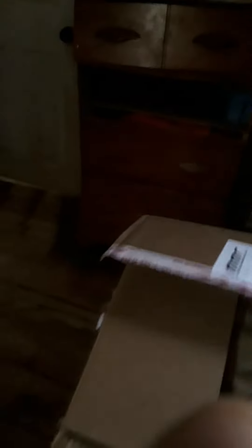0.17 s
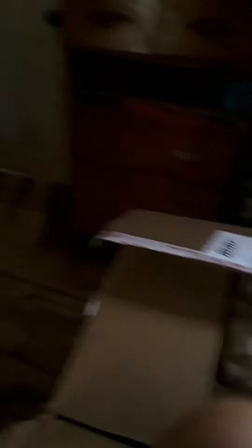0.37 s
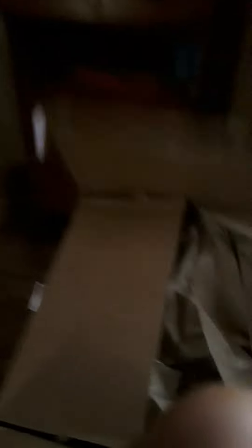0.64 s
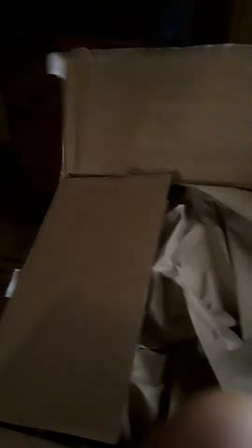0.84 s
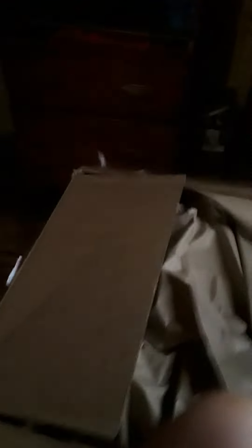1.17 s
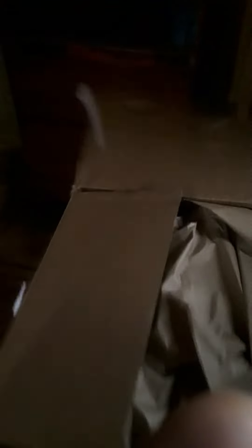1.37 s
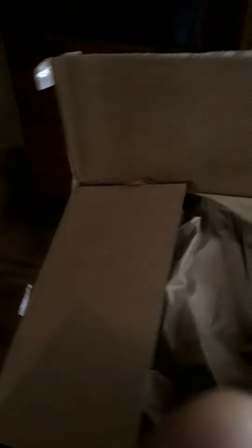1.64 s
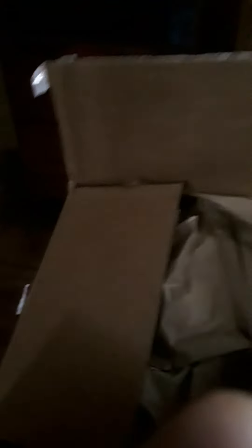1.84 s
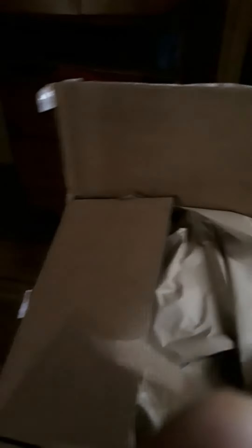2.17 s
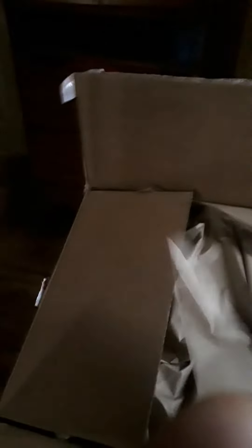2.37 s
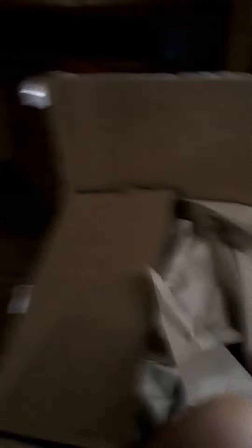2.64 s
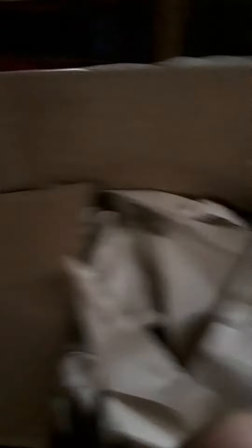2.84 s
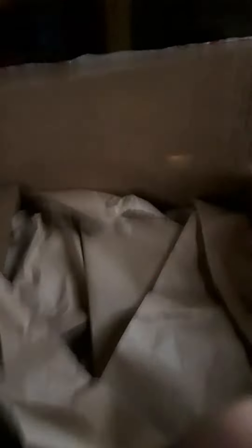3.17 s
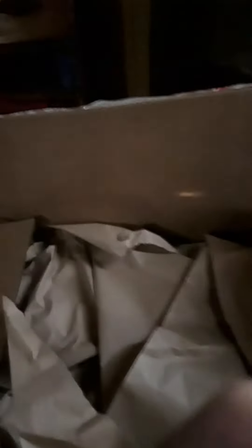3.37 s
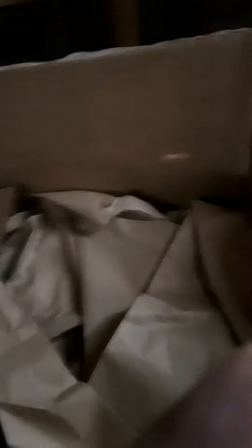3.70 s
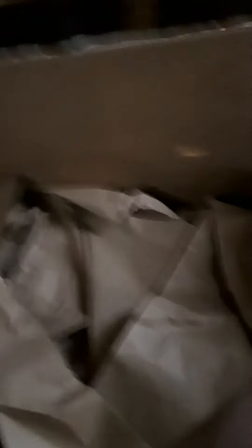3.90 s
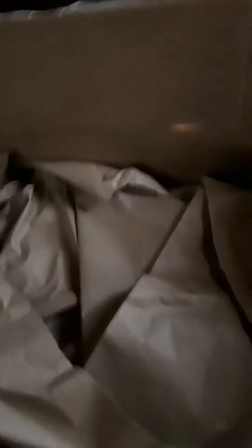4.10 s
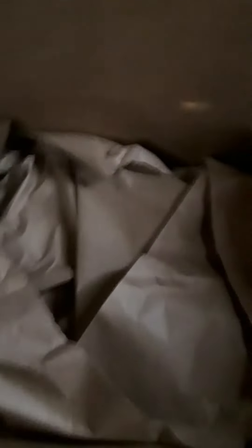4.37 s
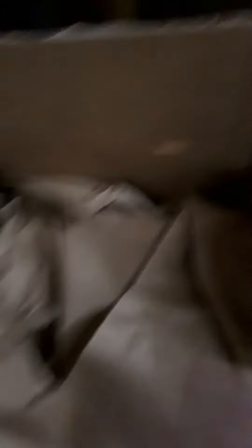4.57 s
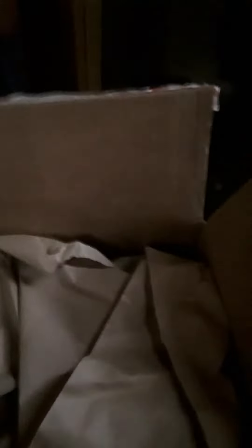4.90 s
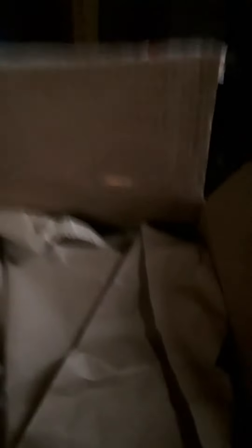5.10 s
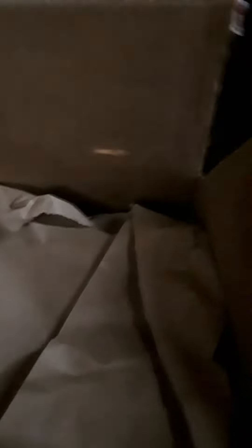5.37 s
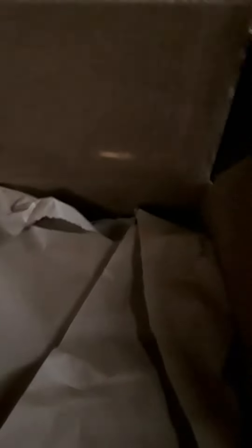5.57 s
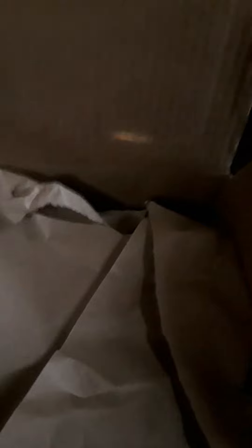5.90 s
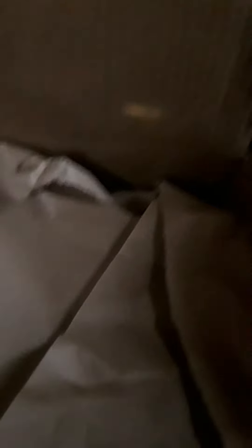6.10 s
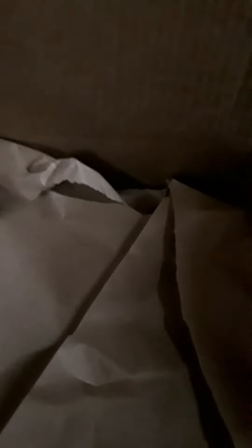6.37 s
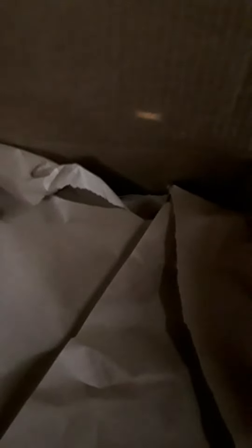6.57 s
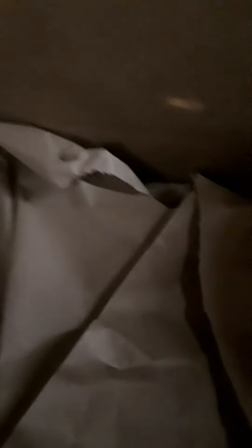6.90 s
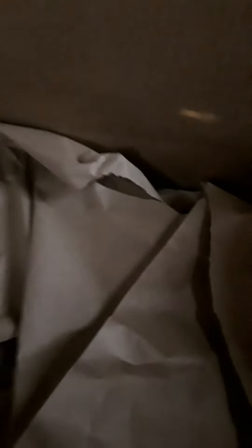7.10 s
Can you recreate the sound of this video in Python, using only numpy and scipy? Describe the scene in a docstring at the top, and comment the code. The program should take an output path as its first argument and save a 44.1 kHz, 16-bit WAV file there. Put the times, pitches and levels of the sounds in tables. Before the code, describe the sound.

A hand rustles over a cardboard box and its packing paper, with dull box rumble, dry snaps, a hushed middle and a loud crinkling finish.

```python
"""First skin hisses over cardboard while the box drones; a hand folds back the flaps and drags out packing paper.
Skin and crinkles are noise under showers of tiny slips; the scrape adds wandering resonances to such noise.
The box walls drone as rubbed noise with a ringing panel. Snaps are cracks with a brief ring, taps ring the modes
of a flap, knocks are damped thuds. Two close microphones hear it all over the soft noise of a quiet room."""
import sys
import numpy as np
from scipy import signal
from scipy.fft import rfft, irfft, next_fast_len
from scipy.io import wavfile
from scipy.ndimage import uniform_filter1d

SR = 44100
rng = np.random.default_rng(int(sys.argv[2]) if len(sys.argv) > 2 else 0)


def pcm_store(signal):
    """Save signal as 16-bit PCM."""
    levels = np.round(np.clip(np.atleast_2d(signal), -1, 1) * 32767)
    wavfile.write(sys.argv[1], SR, levels.astype(np.int16).T)


N = 319450  # length in samples

# Steady pressure of the hand between strokes: t/s, level/dB
CONTACT_PRESSURE = [(0, -43), (.125, -62), (.143, -36.5), (.42, -47.5), (.79, -49), (1.25, -88),
                    (1.66, -47.5), (1.84, -43), (2.05, -60), (2.3, -48), (2.42, -80), (2.7, -72.5),
                    (2.708, -55.5), (3.02, -71), (3.1, -56.5), (3.42, -55.5), (3.75, -66.5), (4.586, -72),
                    (4.596, -41), (4.85, -40), (5.05, -45), (5.6, -52.5), (6.17, -44.5), (6.26, -36.5),
                    (6.33, -50.5), (6.492, -58.5), (6.502, -37.5), (7.24, -45)]
# Strokes that swell and let go: peak t/s, level/dB, swell/s, release/s, extra fine skin hiss/dB
HAND_STROKES = [(.26, -36, 0.081, 0.16, -2), (.514, -40, 0.22, 0.067, 1), (0.815, -37.5, 0.02, 0.18, -5.5),
                (.968, -42.5, 0.016, 0.12, -26), (1.171, -30, 0.17, 0.091, -2.5),
                (1.308, -27, 0.013, 0.18, -4), (1.396, -24, 0.11, 0.2, -2), (1.55, -22.5, 0.019, 0.08, -11),
                (1.853, -37.5, 0.03, 0.14, 4), (2.254, -38.5, 0.092, 0.063, 5),
                (2.788, -58.5, 0.067, 0.15, 11), (3.16, -50, 0.2, 0.29, 14), (3.39, -43, 0.17, 0.096, 10),
                (3.601, -46.5, 0.25, 0.093, 1.5), (3.941, -50.5, 0.065, 0.073, 11.5),
                (4.01, -51.5, 0.3, 0.15, 3), (4.078, -49.5, 0.083, 0.038, -4),
                (4.291, -68, 0.1, 0.027, 23.5), (4.872, -33, .015, 0.2, 2), (4.983, -29.5, 0.077, 0.03, 4),
                (5.089, -32, 0.061, 0.061, 6), (5.213, -35.5, 0.2, 0.19, 3), (5.303, -33, 0.035, 0.019, 12),
                (5.462, -37.5, 0.24, 0.021, 5.5), (5.58, -43, 0.19, 0.54, 2),
                (5.904, -35, 0.047, 0.02, 5.5), (6.0, -62, 0.1, 0.055, 23),
                (6.244, -29.5, 0.074, 0.0041, 6.5), (6.639, -21.5, 0.089, 0.14, -7),
                (6.767, -23.5, 0.16, 0.048, -5), (6.849, -24, 0.057, 0.34, -4),
                (7.0, -22.5, 0.051, 0.24, -0.5), (7.073, -22, 0.28, 0.061, -26),
                (7.153, -27.5, 0.026, 0.37, -1)]
STROKE_RANGE_DB = 20  # level change over one swell or release time
# Where each way of handling puts the effort: name: (sliding skin/dB, crinkle/dB, scrape/dB, box drone/dB)
HANDLING_MIX = {"glide": (-2, -15, -19.5, -22), "lift": (-4, -8.5, -4.5, -1), "fold": (-2, -7.5, -6, -5),
                "crumple": (-3, -6, -10.5, -9.5), "drag": (-8, -11, -2.5, -2), "pull": (5.5, -6.5, -5, 0)}
# When each way of handling begins: t/s, name
HANDLING_PHASES = [(0, "pull"), (.14, "lift"), (.34, "fold"), (1.05, "crumple"), (1.9, "fold"),
                   (2.171, "crumple"), (2.702, "drag"), (2.8, "fold"), (3.1, "glide"), (4.59, "drag"),
                   (5.5, "pull"), (6.185, "glide"), (6.502, "fold"), (6.62, "crumple")]
CHANGE_S = 0.054  # time taken to pass from one to the next
# Where the hand is: t/s, lean to the left/dB (negative leans right), before the near side is held steady
HAND_PLACE = [(0, -4), (.3, 3.5), (1.7, 2.5), (2.7, 2), (3.1, -30), (3.6, -16), (4.5, -11), (5, -1),
              (7.24, -1)]

# Noise colours of the sliding skin, crinkling paper and scraping paper: f/Hz, level/dB per Hz
SKIN_SPECTRUM = [(1500, -42), (1850, -15), (2200, -27.5), (3200, -8.5), (4500, -6), (7000, -6.5),
                 (9800, -12.5), (10800, -4.5), (12400, -1), (15500, -13.5), (15800, -48.5)]
CRINKLE_SPECTRUM = [(1200, -14.5), (2000, 5.5), (3700, 5), (6500, -8.5), (9000, -21.5)]
SCRAPE_SPECTRUM = [(300, -23.5), (500, -11.5), (1750, -10.5), (2300, -16), (4000, -42)]
FINE_HZ = 8900  # above this the skin whispers
# Resonances under the dragging sheet: f/Hz (1 where SHEET_PITCH gives it), width/Hz of each pass, level/dB
SHEET_RESONANCES = [(1.0, 260, -9), (1800, 170, -9), (2930, 260, -15)]
# The lowest resonance follows the span of the sheet: t/s, f/Hz
SHEET_PITCH = [(4.62, 1050), (4.9, 1560), (5.1, 1247), (7.24, 905)]
RESONANCE_WANDER = 0.025  # rms fraction of the pitch
RESONANCE_SHARE = 1.4  # gain of the resonances against the plain drag

# Noise colour of the rubbed box walls: f/Hz, level/dB per Hz
WALL_SPECTRUM = [(45, -58), (90, -7.5), (250, -0.5), (600, -3.5), (900, -26)]
# The box panel that drones loudest: t/s, f/Hz
PANEL_PITCH = [(0, 245.6), (2.7, 420), (3, 420), (3.4, 160), (4.86, 330), (4.9, 205), (5.02, 205),
               (5.08, 410), (7.24, 400)]

# Creases that snap: t/s, relative level/dB, f/Hz of the buckling patch
CREASE_SNAPS = [(1.162, -12, 4730), (1.23, -27, 1860), (1.306, -25, 950), (1.386, -6.5, 4660),
                (1.387, -20, 1410), (1.542, -15.5, 2600), (1.562, -11.5, 4900), (1.571, -17, 4530),
                (1.61, -24.5, 2280), (2.251, -18.5, 4700), (3.082, -49, 990), (3.478, -43.5, 1140),
                (3.732, -60, 416), (4.686, -27, 2640), (5.294, -28, 1800), (5.658, -25.5, 3020),
                (5.799, -22.5, 4300), (5.896, -21.5, 976), (6.033, -20.5, 4000), (6.158, -34, 5000),
                (6.187, -32, 3400), (6.244, -28, 4050), (6.278, -21.5, 5350), (6.311, -29, 2570),
                (6.345, -30.5, 7000), (6.378, -31.5, 3770), (6.553, -3.5, 4500), (6.587, -19, 2520),
                (6.611, -14.5, 1020), (6.615, -18, 3060), (6.637, -4, 4000), (6.64, -14, 1490),
                (6.697, -17, 1180), (6.74, -4, 3820), (6.757, -11.5, 3240), (6.823, -19, 5040),
                (6.836, -8, 3650), (6.844, -3, 3400), (6.872, -8, 3180), (6.904, -7, 3300),
                (6.955, -9, 2900), (6.988, -2, 3650), (7.002, -8, 2980), (7.022, -8, 3900),
                (7.048, -7, 3030), (7.073, -4.5, 2070), (7.142, -4, 4420), (7.155, -10.5, 3640),
                (7.18, -20, 966), (7.193, -16.5, 960), (7.215, -20, 2500)]
# Noise colour of each crack: f/Hz, level/dB per Hz
CRACK_SPECTRUM = [(300, -47.5), (700, 3), (8000, -0.5), (12000, 3.5), (15500, -10.5)]
# Fingertip and flap taps on the cardboard: t/s, level/dB, brightness/dB per octave
FLAP_TAPS = [(0.504, -29, 3.5), (1.161, -17.5, -4.5), (1.766, -37.5, 16), (1.847, -37.5, 7),
             (2.94, -46, -8), (7.074, -18, 11)]
# Modes of the tapped flap: f/Hz, level/dB, t60/s
FLAP_MODES = [(419, -0.5, 0.036), (740, -0.5, 0.064), (1005, -0.5, 0.068), (1602, 3.5, 0.047),
              (2150, -3.5, 0.091)]
# Knocks on the cardboard: t/s, relative level/dB, f/Hz
PANEL_KNOCKS = [(0.138, -20, 170), (0.184, -22.5, 265), (0.202, -22, 259), (0.238, -26, 262),
                (0.253, -31, 253), (1.789, -41, 106), (2.73, -45.5, 112), (3.372, -48, 72),
                (3.553, -53.5, 99), (3.661, -62.5, 400), (4.357, -66, 393), (4.593, -41, 423),
                (4.917, -24.5, 209), (4.987, -24.5, 212), (5.547, -39, 113), (5.887, -27, 310),
                (6.083, -27, 418)]

# Noise colour of the quiet room: f/Hz, level/dB per Hz
ROOM_SPECTRUM = [(30, -8.5), (102, -3.5), (306, -21), (7500, -29), (12400, -13.5), (15500, -21),
                 (15800, -52.5)]
ROOM_DB = -69.5  # rms level before the microphones
# How alike noise is at left and right: f/Hz, likeness (1 is identical)
STEREO_LIKENESS = [(200, 0.91), (600, 0.6), (3000, 0.028)]
# The left microphone port against the right: f/Hz, level/dB
PORT_COLOUR = [(300, -1.5), (700, -1.5), (3000, -4), (6800, 1.5), (13000, -3)]
EDGE_HZ = 16600  # top of the microphone band


def gain_of(db):
    """Turns decibels into an amplitude factor."""
    return 10 ** (np.asarray(db) / 20)


def evened(x):
    """Scales a sound to a standard deviation of 1."""
    return x / x.std()


def read(points, hz):
    """Reads a table over log frequency."""
    f, value = np.transpose(points)
    return np.interp(np.log1p(hz), np.log1p(f), value)


def follow(table):
    """Draws each column of a timed table as a curve, sample by sample."""
    s, *columns = np.transpose(table)
    t = np.arange(N) / SR
    return [np.interp(t, s, column) for column in columns]


def add(mix, s, sound):
    """Mixes a sound in at a time, cut off at the end."""
    start = round(s * SR)
    part = mix[:, start:start + sound.shape[-1]]
    part += sound[..., :part.shape[-1]]


def sides(pan_db):
    """Left and right gains; a soft limit keeps the nearer side steady."""
    return np.tanh(gain_of(np.outer([.5, -.5], pan_db)))


def slips(per_s, spread_db, fade_s, bed):
    """Envelope of tiny slips: sudden starts, quick fades, a few large, over a steady bed."""
    starts = rng.random(N) < per_s / SR
    sizes = gain_of(spread_db * np.minimum(rng.exponential(size=N), 3)) * starts
    fade = np.exp(-1 / (fade_s * SR))
    return bed + evened(signal.lfilter([1], [1, -fade], sizes))


def coloured(envelope, spectrum):
    """Noise under an envelope through a spectrum; the bass is more alike at both microphones."""
    size = next_fast_len(N, real=True)
    hz = np.fft.rfftfreq(size, 1 / SR)
    left, other = rfft(rng.standard_normal((2, N)) * envelope, size)
    alike = np.clip(read(STEREO_LIKENESS, hz), 0, 1)
    right = alike * left + np.sqrt(1 - alike ** 2) * other
    pair = np.array([left, right]) * gain_of(read(spectrum, hz))
    return evened(irfft(pair, size)[:, :N])


def resonate(x, hz, width):
    """A gliding resonance: shifts the pitch curve down to zero, smooths, and shifts back."""
    turn = np.exp(2j * np.pi * np.cumsum(hz) / SR)
    keep = np.exp(-np.pi * width / SR)
    smooth = signal.lfilter([1], [1, -keep], x / turn)
    return evened((turn * smooth).real)


def rubbing():
    """One effort of the hand is shared between skin, small creases, the scrape and the box walls."""
    skin_db, crinkle_db, scrape_db, drone_db = handling()
    on_skin, on_paper = effort()
    skin = sliding_skin(skin_db, on_skin, on_paper)
    crinkle = crinkling() * gain_of(crinkle_db) * on_paper
    at_hand = 1.59 * sides(*follow(HAND_PLACE)) * (skin + crinkle)
    on_box = scrape() * gain_of(scrape_db) + drone() * gain_of(drone_db)
    return at_hand + on_paper * on_box


def effort():
    """Steady contact plus strokes, added as power: gains for the finest skin hiss and for all the rest."""
    t = np.arange(N) / SR
    contact_db, = follow(CONTACT_PRESSURE)
    power = gain_of([contact_db, contact_db]) ** 2
    for s, db, swell_s, release_s, hiss_db in HAND_STROKES:
        first = max(round((s - 2 * swell_s) * SR), 0)
        near = slice(first, round((s + 2 * release_s) * SR))
        away = np.maximum((s - t[near]) / swell_s, (t[near] - s) / release_s)
        stroke_db = db - STROKE_RANGE_DB * away + [[hiss_db], [0]]
        power[:, near] += gain_of(stroke_db) ** 2
    return np.sqrt(power)


def handling():
    """The share of each layer in dB, held through a phase and blended just before the next."""
    ends = [s - CHANGE_S for s, _ in HANDLING_PHASES[1:]] + [N / SR]
    held = []
    for (start, way), end in zip(HANDLING_PHASES, ends):
        held += [(start, *HANDLING_MIX[way]), (end, *HANDLING_MIX[way])]
    return follow(held)


def sliding_skin(skin_db, on_skin, on_paper):
    """Skin catches and slips in a dense hiss, its finest band swelling apart from the rest."""
    skin = coloured(slips(430, 2.0, 0.003, 2.5), SKIN_SPECTRUM) * gain_of(skin_db)
    high = signal.butter(4, FINE_HZ, "high", fs=SR, output="sos")
    fine = signal.sosfiltfilt(high, skin)
    return on_paper * (skin - fine) + on_skin * fine


def crinkling():
    """Small creases giving way in a shower of widely uneven slips."""
    return coloured(slips(400, 6.0, 0.0085, 0.3), CRINKLE_SPECTRUM)


def scrape():
    """Paper dragging along the cardboard; its resonances wander as the sheet bends."""
    drag = coloured(slips(92, 7.5, 0.045, 1.5), SCRAPE_SPECTRUM)
    drift = uniform_filter1d(rng.standard_normal((len(SHEET_RESONANCES), N)), size=9000)  # about 0.2 s
    bend = 1 + RESONANCE_WANDER * evened(drift)
    bend[0] *= follow(SHEET_PITCH)[0]
    ringing = 0
    for (hz, width, db), curve in zip(SHEET_RESONANCES, bend):
        once = resonate(drag, hz * curve, width)
        ringing = ringing + gain_of(db) * resonate(once, hz * curve, width)
    return evened(drag + RESONANCE_SHARE * ringing)


def drone():
    """Uneven rubbing shakes the walls; one panel rings in two modes above the broad rumble, nearer the right."""
    walls = coloured(slips(100, 0.57, 0.051, 0.16), WALL_SPECTRUM)
    pitch = follow(PANEL_PITCH)[0]
    low_mode = 1.2 * resonate(walls, pitch, 100)
    high_mode = 0.27 * resonate(walls, 1.72 * pitch, 70)
    return evened(walls + low_mode + high_mode) * sides(-2.5)


def snaps():
    """A crease buckles: a sharp wide crack, a few ms of ringing patch and a short scatter from the box."""
    out, t = np.zeros((2, N)), np.arange(1200) / SR
    crack = coloured(1, CRACK_SPECTRUM)
    decay = np.exp(-t / 0.0016) + 0.055 * np.exp(-t / 0.029)  # the crack, then the scatter
    shape = np.minimum(t / 0.0013, 1) * decay
    places = rng.uniform(-1.04, 1, len(CREASE_SNAPS))  # each a little left or right
    for (s, db, hz), place in zip(CREASE_SNAPS, places):
        burst = crack[:, round(s * SR):][:, :len(t)] * shape
        burst = 0.79 * (hz / 3000) ** 0.14 * burst / abs(burst).max()  # small high patches crack hardest
        ring = np.sin(2 * np.pi * hz * t) * np.exp(-hz * t / 3)  # a few cycles, so high patches die sooner
        ring = 0.78 * ring * np.minimum(t / 0.00051, 1)
        level = gain_of(db + 3.7 * place * np.array([[1], [-1]]))
        add(out, s, level * (burst + ring))
    return out


def taps():
    """A blow of a few ms rings the modes of the flap, each time a little off pitch."""
    out, t = np.zeros((2, N)), np.arange(4000) / SR
    chances = rng.random((len(FLAP_TAPS), 2, len(FLAP_MODES)))
    for (s, db, bright_db), chance in zip(FLAP_TAPS, chances):
        ring = np.zeros(len(t))
        for (hz, mode_db, t60), off, turn in zip(FLAP_MODES, *chance):
            fade = gain_of(mode_db + bright_db * np.log2(hz / 1000) - 60 * t / t60)
            pitch = hz * (0.97 + 0.075 * off)
            ring += fade * np.sin(2 * np.pi * (pitch * t + turn))
        ring *= np.minimum(t / 0.00078, 1)
        add(out, s, gain_of(db) * ring / abs(ring).max())
    return out


def knocks():
    """A short damped thud of a panel, a little to the right."""
    out, t = np.zeros((2, N)), np.arange(4000) / SR
    shape = np.exp(-t / 0.0092) - np.exp(-t / 0.0011)
    for s, db, hz in PANEL_KNOCKS:
        add(out, s, gain_of(db) * np.sin(2 * np.pi * hz * t) * shape)
    return out * sides(-2.0) * 1.75


def room():
    """Quiet air and hiss as steady coloured noise."""
    return gain_of(ROOM_DB) * coloured(1, ROOM_SPECTRUM)


def scene():
    """Everything at the two microphones, from the hand down to the room."""
    return rubbing() + snaps() + taps() + knocks() + room()


def record(dry):
    """The microphones lose the lowest bass and differ a little in colour; then the band limit."""
    lean = signal.sosfilt(signal.butter(2, 65., "high", fs=SR, output="sos"), dry)
    size = next_fast_len(N, real=True)
    port_db = read(PORT_COLOUR, np.fft.rfftfreq(size, 1 / SR))
    ports = gain_of(np.outer([.5, -.5], port_db))
    heard = irfft(rfft(lean, size) * ports, size)[:, :N]
    band = signal.firwin(511, EDGE_HZ, window=("kaiser", 9), fs=SR)
    return signal.oaconvolve(heard, band[None], "same")


dry = scene()
out = record(dry)
pcm_store(out)
```